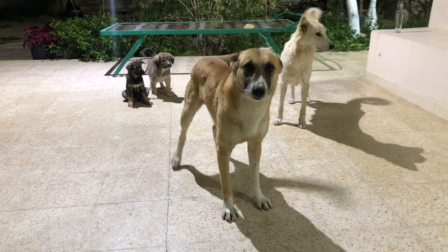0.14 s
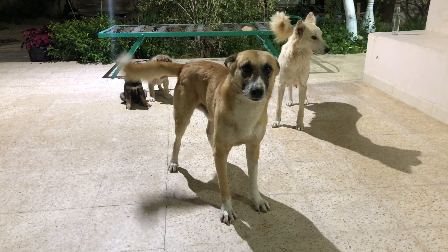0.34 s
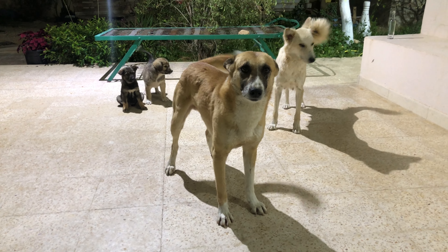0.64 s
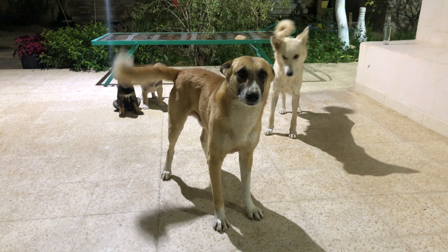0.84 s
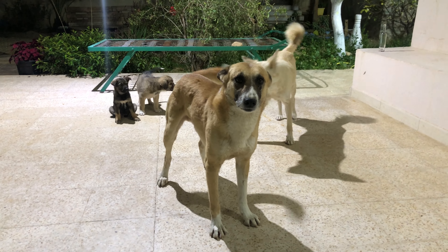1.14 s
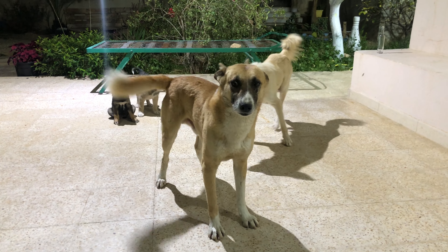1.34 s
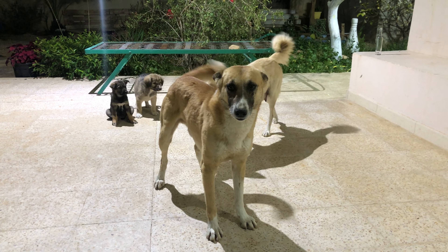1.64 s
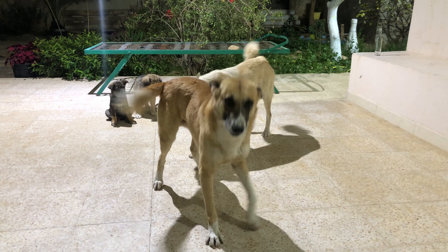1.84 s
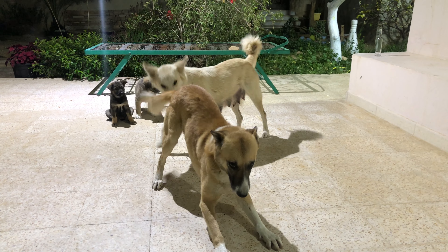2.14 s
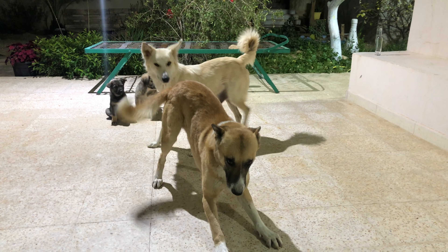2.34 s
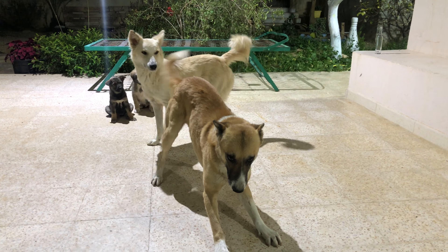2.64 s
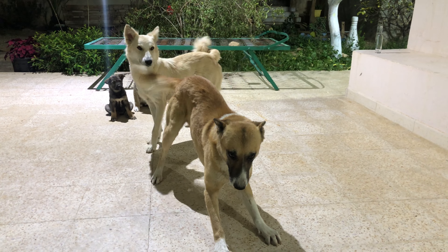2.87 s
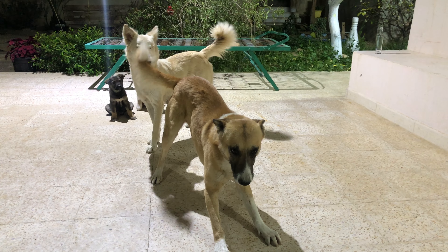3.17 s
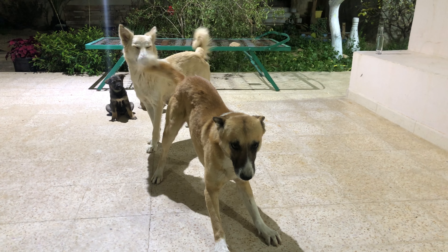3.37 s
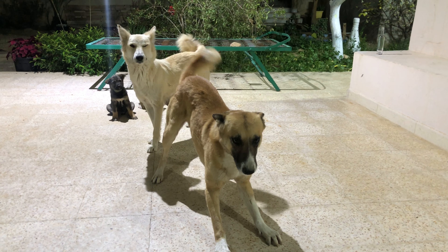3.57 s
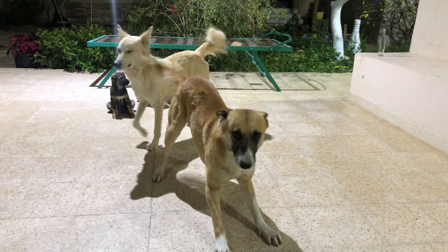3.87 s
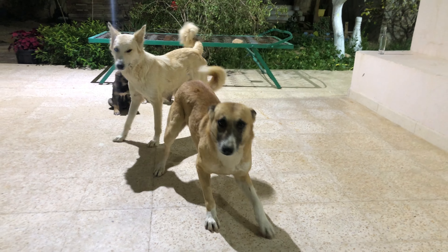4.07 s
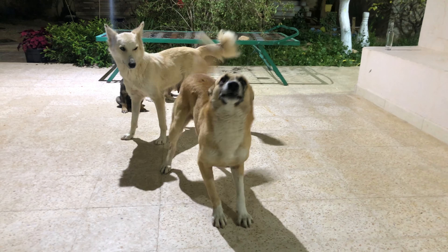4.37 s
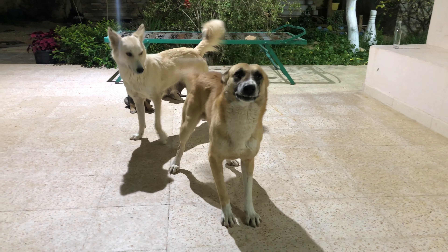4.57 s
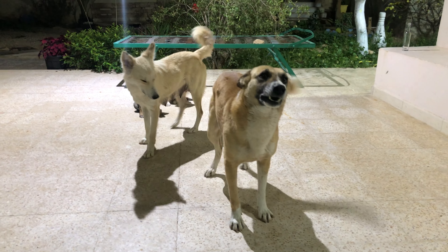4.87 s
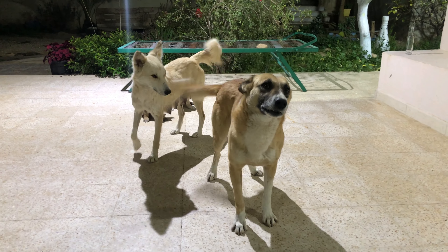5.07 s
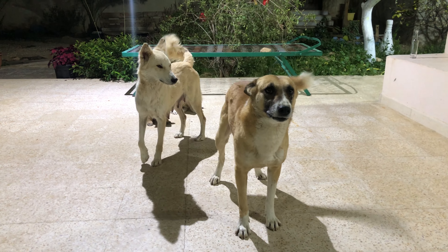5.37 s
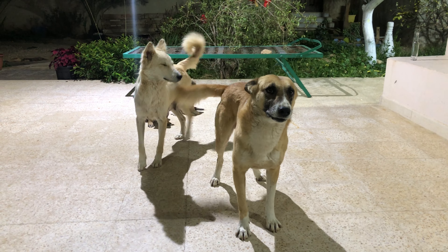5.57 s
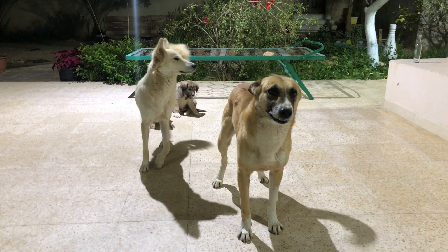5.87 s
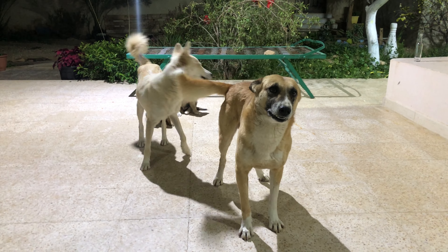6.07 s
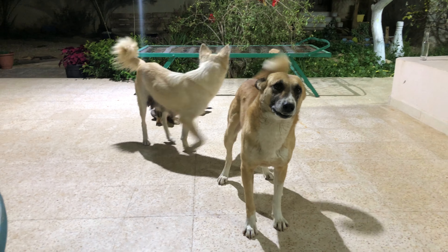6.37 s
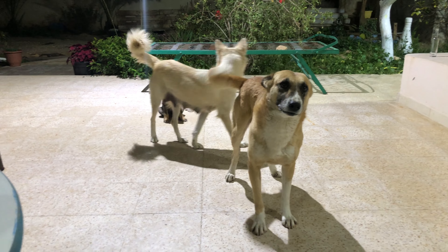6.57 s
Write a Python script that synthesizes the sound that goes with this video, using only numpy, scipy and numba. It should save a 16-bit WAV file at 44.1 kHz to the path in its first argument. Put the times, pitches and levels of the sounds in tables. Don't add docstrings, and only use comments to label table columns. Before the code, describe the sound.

On a tiled patio at night, a large dog about two metres from a phone growls in drawn-out spells: low and open, then a harder surge, a muffled closed-mouth rumble, a tiny grunt, a rough snarl and a last growl. Claws tick, sniffs hiss between, a cricket chirps faintly.

```python
import sys
import numpy as np
from scipy import signal
from scipy.io import wavfile
from scipy.ndimage import uniform_filter1d
from numba import njit

SR = 44100
rng = np.random.default_rng(int(sys.argv[2]) if len(sys.argv) > 2 else 0)


def persist_wave(psi):
    counts = np.round(np.clip(psi, -1, 1) * 32767).astype(np.int16)
    wavfile.write(sys.argv[1], SR, np.atleast_2d(counts).T)


def undo_db(level):
    steps = np.asarray(level, float) / 20
    return 10 ** steps


N = 296263

# start_s, fold_rate_hz, chest_effort_db, throat_opening (0-1), lip_opening (0-1)
OPENING = [
    (.03, 67.3, -51, 0.52, 0.75),
    (.112, 63.24, -44, 0.65, 0.53),
    (.188, 67.56, -51, 0.8, 0.78),
    (.376, 69.85, -49.5, 0.87, 0.77),
    (.48, 64.2, -47.5, 0.67, 0.64),
    (.674, 63.4, -46.5, 0.66, 0.59),
    (.794, 56.36, -47, 0.56, 0.45),
]
RESUMED = [
    (0.795, 56.2, -46.5, 0.62, 0.58),
    (.862, 60.86, -46, 0.53, 0.14),
    (1.015, 57.85, -45.5, 0.55, 0.51),
    (1.145, 67.3, -48.5, 0.66, 0.76),
    (1.32, 71.76, -48.5, 0.84, 0.87),
    (1.401, 65.85, -52.5, 0.79, 0.82),
    (1.445, 57.96, -51, 0.47, 0.72),
    (1.48, 56.93, -62, .3, 0.74),
]
LUNGE = [
    (1.772, 87.84, -45.5, 0.77, 0.83),
    (1.837, 111.8, -39.5, 0.96, 0.99),
    (1.898, 96.74, -37.5, 0.65, 0.74),
    (2.001, 87.56, -38.5, 0.44, 0.77),
    (2.114, 98, -35, 0.29, 0.64),
    (2.244, 66.6, -42.5, 0.33, 0.6),
    (2.425, 57.93, -43.5, 0.18, 0.62),
    (2.465, 55.94, -62, .2, 0.6),
]
MUFFLED = [
    (2.931, 63.2, -42, 0.092, 0.56),
    (2.974, 65.5, -42.5, 0.25, 0.67),
    (3.126, 62.43, -44.5, 0.42, 0.35),
    (3.307, 57.73, -45, 0.1, 0.13),
    (3.344, 57.45, -46, 0.31, 0.36),
    (3.413, 62.63, -44, 0.09, 0.02),
    (3.763, 65.44, -44, 0.16, 0.24),
    (3.856, 58.4, -46.5, 0.2, 0.17),
    (3.899, 55.9, -56, 0.038, 0.9),
]
GRUNT = [
    (4.222, 66.5, -58, 0.22, 0.8),
    (4.26, 66.7, -46.5, 0.25, 0.5),
    (4.3, 68.6, -51, 0.52, 0.49),
    (4.33, 79.6, -48.5, 0.25, 0.76),
    (4.36, 82.5, -69, 0.31, 0.97),
]
SNARL = [
    (4.83, 74.1, -52.5, 0.6, 0.88),
    (4.88, 87.4, -40, 0.71, 0.83),
    (4.965, 104.5, -43, 0.77, 1),
    (5.129, 102.7, -46, 0.83, 0.97),
    (5.215, 80.2, -44, 0.61, 0.77),
    (5.289, 75.56, -47.5, 0.68, 0.84),
    (5.418, 85, -42.5, 0.56, 0.83),
    (5.549, 76.24, -49.5, 0.75, 0.98),
    (5.651, 74.1, -65.5, 0.7, 1),
]
LAST = [
    (5.965, 72.34, -61.5, 0.9, 0.95),
    (6.046, 80.1, -41, 0.68, 0.84),
    (6.127, 86.5, -41.5, 0.66, 0.9),
    (6.267, 81.26, -43, 0.48, 0.81),
    (6.367, 87.3, -41.5, 0.58, 0.89),
    (6.505, 85.64, -39, 0.38, 0.76),
    (6.624, 78.15, -47, 0.7, 0.82),
    (6.718, 75.6, -58, 0.59, 0.97),
]
SPELLS = [OPENING, RESUMED, LUNGE, MUFFLED, GRUNT, SNARL, LAST]
EDGES_S = [growl[i][0] for growl in SPELLS for i in (0, -1)]


def level(x, db):
    return x * undo_db(db) / np.sqrt(np.mean(x ** 2))


def glide(table):
    s, *columns = np.transpose(table)
    return [np.interp(np.arange(N) / SR, s, column) for column in columns]


@njit
def svf(x, hz, width):
    y, band, low = np.empty(len(x)), 0., 0.
    for i in range(len(x)):
        g, damping = np.tan(np.pi * hz[i] / SR), width / hz[i]
        v = (band + g * (x[i] - low)) / (1 + g * (g + damping))
        band, low, y[i] = 2 * v - band, low + 2 * g * v, damping * v
    return y


def ring(x, hz, width):
    return svf(x, hz + np.zeros(N), 1. * width)


def walk(rate):
    k = int(SR / rate)
    held = np.repeat(rng.standard_normal(N // k + 1), k)
    return 1.3 * uniform_filter1d(uniform_filter1d(held, k), k)[:N]


def even(x, span_s=0.016):
    k = int(span_s * SR)
    power = uniform_filter1d(uniform_filter1d(x ** 2, k), k)
    return x / np.sqrt(power + 1e-12)


def patio(x, t60_s, db):
    t = np.arange(int(.6 * SR)) / SR
    tail = rng.standard_normal(len(t)) * np.exp(-np.log(1000) * t / t60_s) * (t > .006)
    return undo_db(db) * signal.fftconvolve(x, tail / np.sqrt(np.sum(tail ** 2)))[:N]


def night():
    # centre_hz, density_db (per Hz)
    spectrum = [(18, -42), (30, -5.5), (179, 7.5), (245, 3), (355, -10.5), (740, -3), (844, -22),
                (1040, -5.5), (1860, -15.5), (2350, -30), (3400, -34), (4300, -24), (4650, -50),
                (8980, -30), (16000, -59)]
    point_hz, point_db = np.transpose(spectrum)
    out, swell = 0, walk(0.72)
    for hz in 45 * 2 ** np.arange(0, 8.6, .5):
        drift_db = .5 * swell + walk(6)
        db = np.interp(np.log(hz), np.log(point_hz), point_db) + 10 * np.log10(hz) + drift_db
        band = ring(ring(rng.standard_normal(N), hz, hz * 0.57), hz, hz * 0.57)
        out = out + undo_db(db) * level(band, 0)
    return level(out, -55)


def cricket():
    # start_s, peak_db
    strokes = [(0.0136, -55), (0.074, -53), (0.482, -56), (0.5398, -55), (0.958, -57), (1.014, -56),
               (1.0827, -55), (1.502, -56), (1.561, -55), (2.646, -57), (2.7033, -63), (3.016, -55),
               (3.0792, -55), (3.4354, -55.5), (3.4982, -56), (3.5869, -54), (4.4337, -53), (4.503, -58),
               (5.636, -53.5)]
    top_hz, fall_hz, stroke_s = 4550, 620, 0.0244
    echo_s, echo_db = 0.0104, -6.5
    out, t = np.zeros(N), np.arange(int(stroke_s * SR)) / SR
    turns = np.cumsum(top_hz - fall_hz * t / stroke_s) / SR
    stroke = np.sin(np.pi * t / stroke_s) * np.sin(2 * np.pi * turns)
    for s, db in strokes:
        i = int((s - .004) * SR)
        out[i:i + len(t)] += undo_db(db - 5.5) * stroke
    echo = undo_db(echo_db) * np.roll(out, int(echo_s * SR))
    return out + echo + patio(out, 0.56, -1.3)


def posture():
    # throat_hz, palate_cavity_hz, teeth_cavity_hz, bared_teeth_db
    head = [(560, 2900, 2530, -8.5), (568, 3200, 2250, -11.5), (582, 3200, 2105, -31.5),
            (554, 3107, 2620, -3.5), (581, 2750, 2460, 5), (630, 3100, 2500, -24), (644, 3100, 2470, -13),
            (546, 3230, 2800, -4), (565, 3300, 3000, 15), (590, 2970, 2300, -7), (542, 2700, 2490, 2),
            (521.6, 2680, 2464, -9.5), (531, 3060, 2700, -6), (545, 2860, 2530, -6.5)]
    # fundamental_db, nose_db, breath_db, lower_throat_share (0-1), chest_hz
    character = [
        (-56, -33.5, -78, 0.35, 165.2),
        (-56.5, -32.5, -79, 0.37, 168.7),
        (-60, -26, -86, 0.24, 163.6),
        (-60, -28, -81, 0.35, 170),
        (-62.5, -29, -110, 0.67, 160),
        (-57, -27, -79, 0.58, 176),
        (-57.5, -33.5, -76.5, 0.6, 193.7),
    ]
    return glide(np.column_stack([EDGES_S, head, np.repeat(character, 2, axis=0)]))


def strain():
    # start_s, end_s, roughness (0-1)
    strained = [(0, .1, .45), (.77, .81, .12), (1.7, 1.91, .45), (1.91, 2.5, .3), (2.88, 2.97, .55),
                (3.2, 3.36, .14), (3.86, 4.1, .6), (4.1, 4.31, .06), (4.31, 4.5, .7), (4.75, 4.9, .3),
                (4.9, 5.17, .45), (5.56, 5.75, .6), (5.9, 6.08, .25), (6.08, 6.14, .8), (6.14, 6.2, .55),
                (6.2, 6.35, .12), (6.35, 6.41, .75), (6.41, 6.65, .33), (6.65, 6.72, .75)]
    t, calm = np.arange(N) / SR, .045
    rough = calm + sum((r - calm) * (t >= a) * (t < b) for a, b, r in strained)
    voiced = sum(1. * (t >= growl[0][0]) * (t < growl[-1][0]) for growl in SPELLS)
    return uniform_filter1d(rough, int(.04 * SR)), uniform_filter1d(voiced, int(0.01 * SR))


def cycles(hz):
    first_slap_s = .006
    phase = np.cumsum(hz) / SR
    at = phase[[int((growl[0][0] + first_slap_s) * SR) for growl in SPELLS]]
    shift = np.round(at) - at
    shift[1] = shift[0]
    return phase + np.interp(np.arange(N) / SR, EDGES_S, np.repeat(shift, 2))


def slaps(phase, slip, size):
    out = np.zeros(N)
    at = np.interp(np.arange(len(slip)) + slip, phase, np.arange(N))
    whole, part = at.astype(int), at % 1
    np.add.at(out, whole, size * (1 - part))
    np.add.at(out, np.minimum(whole + 1, N - 1), size * part)
    return out


def rebound(first, phase, chance):
    # size (0-1), place_in_cycle (0-1), throat_lag_s
    bounce = [
        (0.35, .55, 0.000976),
        (0.36, .55, 0.00098),
        (0.47, 0.44, 0.0011),
        (0.35, .5, 0.0011),
        (0.3, 0.49, .001),
        (0.52, 0.37, 0.00301),
        (0.36, 0.41, 0.00197),
    ]
    first_cycle = np.interp([growl[0][0] for growl in SPELLS], np.arange(N) / SR, phase)
    cycle = np.arange(len(chance))
    row = np.clip(np.searchsorted(first_cycle, cycle) - 1, 0, None)
    size, place, lag_s = np.array(bounce)[row].T
    both = first + slaps(phase, place + .025 * chance, size * undo_db(1.5 * chance[::-1]))
    lag = np.interp(phase, cycle, lag_s) * SR
    return np.interp(np.arange(N) - lag, np.arange(N), both)


def folds(phase, rough):
    chance = rng.standard_normal((5, int(phase[-1])))
    unrest = np.interp(np.arange(chance.shape[1]), phase, rough)
    steady = slaps(phase, .05 * unrest * chance[0], undo_db(3. * unrest * chance[1]))
    loose = slaps(phase, (.003 + .12 * unrest) * chance[0], undo_db((1. + 5. * unrest) * chance[2]))
    loose = loose + slaps(phase, .4 + .15 * chance[3], unrest * chance[4])
    puff = rng.standard_normal(N) * np.exp(-(phase % 1) / .45)
    return steady, loose, rebound(loose, phase, chance[3]), puff


def cavity(x, hz, width, unrest, flutter_db=-0.5):
    hz = hz * (1 + .009 * unrest * walk(14))
    flutter = undo_db((.7 * flutter_db + 1.5 * unrest) * walk(18))
    return flutter * ring(ring(x, hz, width), hz, 1.3 * width) / np.sqrt(width)


def body(x, modes, unrest, flutter_db=1.):
    return sum((-1) ** k * undo_db(db) * cavity(x, hz, width, unrest, flutter_db)
               for k, (hz, width, db) in enumerate(modes))


def chest(steady, hz, rest_hz):
    overtones = steady - ring(steady, hz, 30)
    chest_hz = rest_hz - 8.1 * np.clip(62 - hz, 0, 6)
    return ring(ring(overtones, chest_hz, 70.5), chest_hz, 76)


def throat(rebounding, puff, rough, throat_hz, low_share):
    drive = rebounding + (.003 + .16 * rough) * puff
    upper = cavity(drive, throat_hz, 127.6, rough, 1.6)
    lower = low_share * cavity(drive, 461.5, 100, rough, 4.9)
    return upper + lower - 0.15 * cavity(drive, 836, 51, rough, 0.75)


def mouth(loose, puff, rough, palate_hz, teeth_hz, snarl_db):
    # start_s, jaw_cavity_hz
    jaw = [(.1, 805), (.37, 1030), (.5, 834), (1.02, 776), (1.32, 1030), (1.84, 1104), (2.1, 748),
           (2.93, 1090), (3.12, 860), (3.33, 881), (3.86, 855), (4.38, 1040), (4.88, 910), (5.07, 1056),
           (5.42, 980), (6.27, 1002), (6.33, 1090), (6.37, 920), (6.43, 945), (6.47, 1069), (6.6, 960),
           (6.67, 1070), (6.71, 960)]
    # start_s, tongue_cavity_hz, tongue_db
    tongue = [(0, 1600, -4), (.45, 1501, 0.5), (1., 1540, 13), (1.3, 1707, 0), (1.45, 1750, -4),
              (1.8, 1890, 0), (1.88, 1830, 0), (1.92, 1550, 1), (2., 1775, 8.5), (2.05, 1600, -7),
              (2.12, 1660, 9), (2.2, 1720, 9), (2.24, 1540, 4), (2.33, 1520, 9), (2.44, 1540, 23),
              (2.94, 1680, 2.5), (3.9, 1670, -5), (4.22, 2000, -10), (4.36, 1690, -2), (4.84, 1900, 3),
              (4.9, 1900, -1), (5., 1870, -4), (5.16, 1890, -5.5), (5.3, 1822, -9.5), (5.62, 1650, -7),
              (5.97, 1600, -5), (6.05, 1710, 0), (6.12, 1600, -5), (6.2, 1600, -1), (6.38, 1540, -2),
              (6.5, 1720, -15), (6.7, 1624, -3)]
    # centre_hz, width_hz, level_db
    mouth_modes = [
        (1440, 114, -7),
        (2096, 260, -8),
    ]
    jaw_hz, = glide(jaw)
    tongue_hz, tongue_db = glide(tongue)
    drive = loose * undo_db(2 * walk(70)) + (.025 + .22 * rough) * puff
    front = body(drive, mouth_modes, rough, 2.1) - undo_db(tongue_db) * cavity(drive, tongue_hz, 168, rough)
    front = front - undo_db(-12.5) * cavity(drive, palate_hz, 147, rough, 2.6)
    front = front + undo_db(-10.5) * cavity(drive, teeth_hz, 187, rough, 4.1)
    return cavity(drive, jaw_hz, 196, rough, 3.7) - undo_db(snarl_db) * front


def nose(loose, puff, rough):
    # start_s, nostril_hz, sinus_hz, sinus_db, flare_db
    nostrils = [(0, 5040, 4600, 16, -3), (.3, 5170, 4540, 21, 6), (.5, 5140, 4540, 17, -1),
                (.85, 5270, 4680, 21, 0), (1.1, 5100, 4330, 20, -1.5), (1.27, 5120, 4130, 16, 1),
                (1.45, 5160, 4240, 4, -4), (1.78, 4200, 3693, 17, 3), (1.87, 4250, 3720, 19, 3),
                (1.92, 4840, 4050, 15, -4), (2., 5100, 4280, 18, 0), (2.06, 4930, 4300, 9, -3),
                (2.13, 4970, 4100, 17, 3), (2.2, 5360, 4600, 11, -6), (2.36, 5360, 4796, 2, -3),
                (2.42, 5404, 4840, 8, -5), (2.94, 5300, 4564, 25, -1), (3.02, 5300, 4760, 7, -5.5),
                (3.12, 5250, 4700, 4, 2), (3.2, 5150, 4600, -2, -4), (3.255, 5080, 4660, 4, 1),
                (3.285, 5500, 4900, 12, -3), (3.32, 5700, 4980, 17, 1.5), (3.4, 5546, 4800, 24, 2.5),
                (3.52, 5470, 4670, 21, 3), (3.65, 5100, 4433, 11, 1), (3.82, 5200, 4300, 11, 4),
                (4.84, 4790, 4280, 6, -7.5), (4.95, 5000, 4390, 36, 2), (5.1, 4900, 4250, 29, 2.5),
                (5.18, 5060, 4450, 9, -4.5), (5.4, 4986, 4380, 25, 0), (5.55, 5143, 4430, 19, 1),
                (5.97, 4900, 4480, 23, 3.5), (6.12, 4850, 4250, 17, 4.5), (6.3, 5000, 4400, 17, 3),
                (6.39, 5000, 4140, 31, 2), (6.5, 5030, 4240, 17, -4), (6.7, 4800, 4350, 14, 7.5)]
    # centre_hz, width_hz, level_db
    passages = [
        (6220, 150, 8.5),
        (6790, 340, 12),
        (7530, 290, 9.5),
    ]
    nostril_hz, sinus_hz, sinus_db, flare_db = glide(nostrils)
    snort_s, snort_half_s, flutter_db = 1.825, .05, 3.5
    snort_db = 12 * np.exp(-((np.arange(N) / SR - snort_s) / snort_half_s) ** 2)
    drive = loose * undo_db(2.5 * walk(70)) + (.012 + .25 * rough) * puff
    out = undo_db(snort_db) * body(drive, passages, rough, flutter_db)
    out = out + undo_db(20.5) * cavity(drive, nostril_hz, 410, rough, flutter_db)
    out = out - undo_db(sinus_db) * cavity(drive, sinus_hz, 360, rough, flutter_db)
    return out - .75 * (1 - rough) * ring(out, 3550, 700), flare_db


def dog():
    hz, effort_db, gape, lips = glide(np.vstack(SPELLS))
    throat_hz, palate_hz, teeth_hz, bared_db, hum_db, nose_db, breath_db, low_share, chest_hz = posture()
    rough, voiced = strain()
    phase = cycles(hz)
    steady, loose, rebounding, puff = folds(phase, rough)
    tighter_hz, harder_db = hz - 65, effort_db + 48
    hum_db = hum_db + 0.6637 * tighter_hz + 0.14 * harder_db
    breath_db = breath_db + 0.7513 * tighter_hz + 0.049 * harder_db - 40 * (1 - voiced)
    hum = np.sqrt(2) * np.sin(2 * np.pi * phase) * undo_db(4.5 * rough * walk(30))
    chest_db = 0.03 * np.clip(hz - 98, 0, None)
    throat_db, mouth_db = -16.5 + 31.5 * gape, -40 + 49 * lips
    nasal, flare_db = nose(loose, puff, rough)
    nose_db = nose_db + 12.5 * gape + 7 * lips + flare_db - 0.5 * walk(7.6)
    voice = undo_db(chest_db) * even(chest(steady, hz, chest_hz))
    voice = voice + undo_db(throat_db) * even(throat(rebounding, puff, rough, throat_hz, low_share))
    voice = voice + undo_db(mouth_db) * even(mouth(loose, puff, rough, palate_hz, teeth_hz, bared_db + 2.5 * rough))
    voice = voice + undo_db(nose_db) * even(nasal)
    return voiced * (undo_db(hum_db) * hum + undo_db(effort_db) * voice), voiced, phase, breath_db


def cracks():
    # start_s, level_db
    hard_slaps = [(.036, -47), (2.939, -49), (.058, -46), (4.181, -46), (4.303, -53), (4.849, -31),
                  (4.835, -40), (4.863, -25.5), (4.897, -21.5), (4.929, -22), (4.957, -27.5),
                  (5.971, -39.5), (6.365, -35)]
    # centre_hz, width_hz, level_db
    gullet = [
        (596, 96, -3),
        (1030, 250, -15),
        (1600, 580, -3.5),
        (2490, 180, -8),
        (3040, 250, -19.5),
    ]
    s, db = np.transpose(hard_slaps)
    hits = np.zeros(N)
    hits[(s * SR).astype(int)] = undo_db(db)
    return sum((-1) ** k * undo_db(g) * SR / (np.pi * w) * ring(ring(hits, hz, w), hz, 2 * w)
               for k, (hz, w, g) in enumerate(gullet))


def swells():
    # peak_s, rise_s, fall_s, hiss_db, dull_part_db (relative)
    sniffs = [(.2, 0.0066, 0.043, -64.5, 16), (.92, 0.016, 0.046, -70, 5), (1.44, 0.057, 0.037, -73, 13),
              (1.66, 0.015, 0.035, -70, -3), (1.8, 0.01, 0.04, -54, 15), (1.96, 0.012, 0.096, -53.5, 12),
              (2.072, 0.12, 0.027, -52.5, 12.5), (2.32, 0.052, 0.14, -66.5, -1),
              (2.79, 0.034, 0.011, -65.5, -1), (2.86, 0.016, 0.063, -69, 3), (3.48, .02, 0.026, -70, -10),
              (3.998, 0.036, 0.011, -40, -5.5), (4.099, 0.041, 0.011, -57, -1),
              (4.191, 0.088, 0.076, -65.5, 8.5), (4.379, 0.067, 0.043, -54.5, -2),
              (4.74, 0.0067, 0.17, -61.5, 2), (4.81, 0.018, 0.016, -62.5, 8), (5.14, .012, 0.019, -57, 7),
              (5.41, 0.091, 0.28, -67.5, 10.5), (5.739, 0.032, 0.051, -71, -12),
              (5.87, 0.031, 0.084, -72, 6), (6.15, 0.075, 0.065, -55.5, -4)]
    s, rise_s, fall_s, db, dull_db = np.array(sniffs).T[:, :, None]
    t = np.arange(0, N / SR, .002)
    bright = undo_db(2 * db) * np.exp(-2 * np.abs(t - s) / np.where(t < s, rise_s, fall_s))
    return [np.sqrt(np.interp(np.arange(N) / SR, t, power.sum(axis=0)) + undo_db(2 * -81.5))
            for power in (bright, bright * undo_db(2 * dull_db))]


def air(voiced, phase, breath_db):
    # centre_hz, width_hz, level_db
    gaps = [
        (6500, 1200, -1.5),
        (8570, 1300, 1),
        (10573, 1700, 3.5),
        (12000, 1100, 1.5),
        (13000, 1400, 0),
        (15000, 1900, 5.5),
    ]
    bright_gain, dull_gain = swells()
    grains = rng.standard_normal((4, N)) * undo_db(2.4 * np.array([walk(rate) for rate in (300, 220, 250, 200)]))
    bright = level(ring(ring(grains[0], 8260, 6600), 11800, 13000), 0.5)
    dull, blown = (level(ring(ring(g, 5000, 4500), 5000, 4500), 0) for g in grains[1:3])
    dull, blown = (d - .5 * voiced * ring(d, 3500, 900) for d in (dull, blown))
    gate = even(.25 + 2 * np.exp(-(phase % 1) / .22))
    teeth = level(body(grains[3] * gate, gaps, 0.54, 6.0), 0) + undo_db(-3.5) * gate * blown
    teeth = teeth - np.clip((-70 - breath_db) / 5, 0, .75) * ring(teeth, 15200, 3000)
    return bright_gain * bright + dull_gain * undo_db(-10 * voiced) * dull + undo_db(breath_db) * teeth


def claws():
    # start_s, peak_db, centre_hz
    ticks = [(0.199, -33.5, 4100), (1.443, -47, 8400), (1.9623, -27, 5200), (2.305, -42, 8000),
             (2.3237, -37, 5500), (2.599, -33, 6100), (2.6054, -50, 5450), (2.8624, -37.5, 7274),
             (3.7909, -41, 4940), (3.917, -52, 11080), (4.181, -35, 4300), (4.4798, -43.5, 4310),
             (4.7324, -29, 7900), (4.809, -31, 9495), (4.8557, -32.5, 4620), (1.845, -40, 12500),
             (2.0, -37, 11000), (5.132, -40, 9000), (5.62, -51, 8170), (5.636, -47, 6840),
             (5.6603, -61, 4370), (5.733, -36, 7800), (5.862, -49, 4620)]
    out, t = np.zeros(N), np.arange(400) / SR
    decay = np.exp(-t / 0.00018) + 0.071 * np.exp(-t / 0.024)
    for s, db, hz in ticks:
        tick = svf(rng.standard_normal(400) * decay, hz + 0 * t, 8000.0)
        tick = tick - svf(tick, 1500 + 0 * t, 4000.)
        i = int(s * SR)
        out[i:i + 400] += undo_db(db) * tick / np.abs(tick).max()
    return out


def whines(phase):
    # centre_s, half_length_s, pitch_hz, level_db
    tones = [(1.84, 0.06, 602.4, -37.5), (1.864, 0.017, 1865, -34.5), (4.192, 0.0078, 200, -50),
             (4.926, 0.019, 600, -34), (5.09, 0.022, 1393, -37), (6.102, 0.038, 1070, -38),
             (6.111, 0.013, 2700, -43), (6.113, 0.014, 1610, -41.5), (6.143, 0.025, 475, -40),
             (6.271, 0.069, 578, -40), (6.384, 0.062, 440, -41), (6.402, .045, 215, -42.5),
             (6.406, 0.047, 870, -42), (6.504, 0.035, 1080, -46), (6.66, 0.01, 1180, -47)]
    t = np.arange(N) / SR
    turn = 2 * np.pi * np.cumsum(1 + .012 * walk(40)) / SR
    throb = (1 + .6 * np.cos(2 * np.pi * phase - 1)) * undo_db(1.5 * walk(60))
    return throb * sum(np.sqrt(2) * undo_db(db) * np.exp(-((t - s) / half_s) ** 4) * np.sin(hz * turn)
                       for s, half_s, hz, db in tones)


def puffs():
    # centre_s, half_length_s, centre_hz, width_hz, level_db
    scuffs = [(2.418, 0.019, 2635, 894, -60), (2.608, 0.013, 5250, 700, -57.5),
              (3.938, 0.034, 808.8, 950, -56), (4.06, 0.063, 670, 870, -60), (4.193, 0.026, 486, 891, -56),
              (4.103, 0.056, 4260, 503, -68), (4.21, 0.06, 4450, 600, -62), (4.344, 0.037, 4900, 1200, -61),
              (4.392, .02, 2400, 400, -63), (3.901, 0.0081, 4170, 402.3, -61.5),
              (4.31, 0.011, 890, 695, -49.5), (4.336, 0.034, 1440, 1289, -58),
              (4.449, 0.073, 181, 90.7, -82), (4.615, 0.055, 236, 87, -56.5),
              (4.71, 0.031, 2740, 1830, -55), (5.583, 0.034, 2790, 1490, -56.5),
              (6.11, 0.036, 4180, 697, -50), (6.388, 0.1, 3900, 890, -56),
              (6.66, 0.014, 2960, 893.4, -55.5)]
    t = np.arange(N) / SR
    noise = rng.standard_normal(N)
    return sum(level(ring(ring(noise, hz, width), hz, width), db) * np.exp(-((t - s) / half_s) ** 2)
               for s, half_s, hz, width, db in scuffs)


def scene():
    voice, voiced, phase, breath_db = dog()
    near = voice + cracks() + air(voiced, phase, breath_db) + claws() + whines(phase) + puffs()
    return (night() + cricket() + near + patio(near, .3, -16))[None]


def band_limit(x):
    return signal.sosfilt(signal.butter(12, 16490, fs=SR, output="sos"), x)


def record(dry):
    bass_cut = signal.sosfilt(signal.butter(3, 58, "highpass", fs=SR, output="sos"), dry)
    rounded = np.tanh(4 * bass_cut) / 4
    top_cut = signal.sosfilt(signal.ellip(8, .2, 45, 15900, fs=SR, output="sos"), rounded)
    return band_limit(top_cut)


dry = scene()
out = record(dry)
persist_wave(out)
```